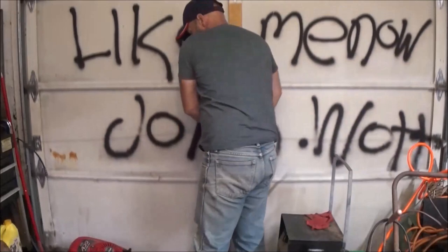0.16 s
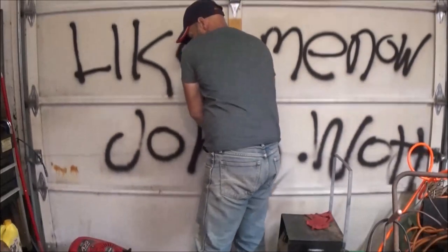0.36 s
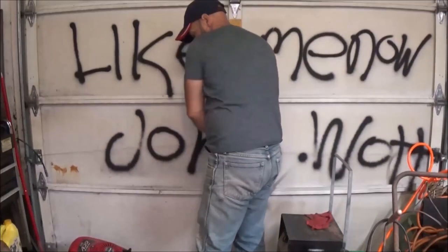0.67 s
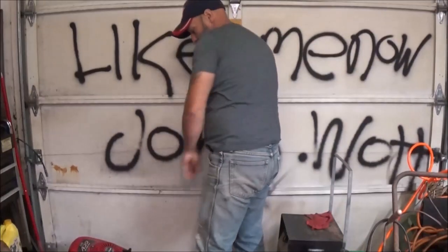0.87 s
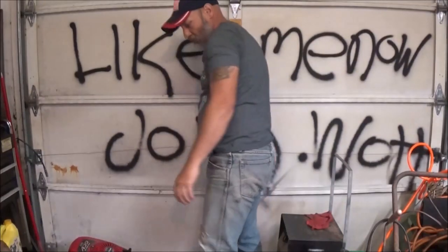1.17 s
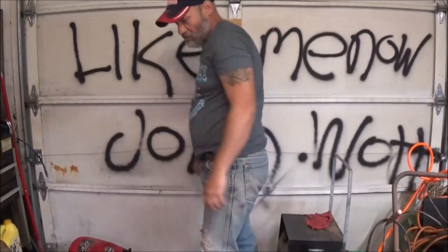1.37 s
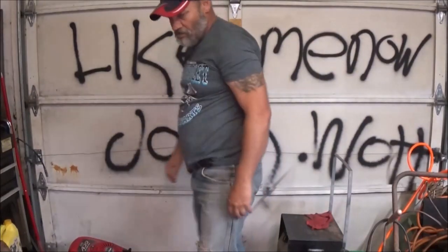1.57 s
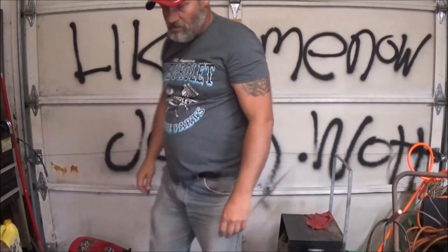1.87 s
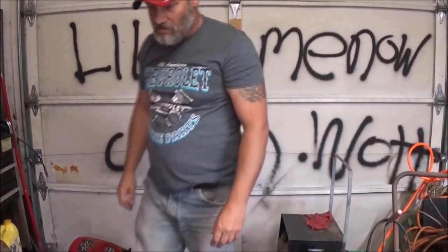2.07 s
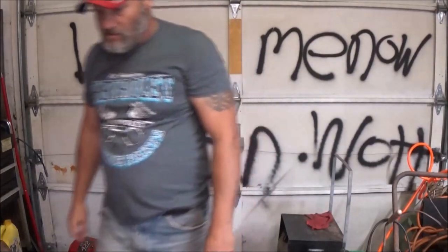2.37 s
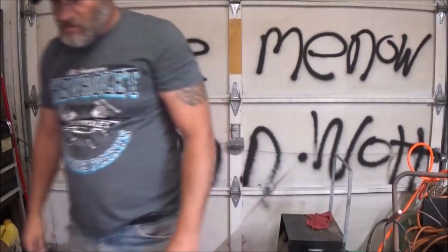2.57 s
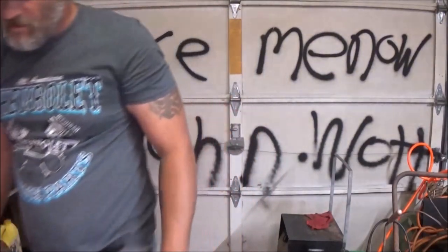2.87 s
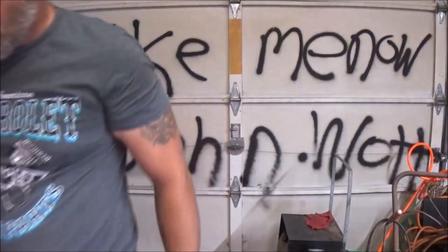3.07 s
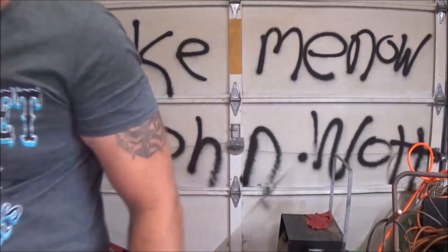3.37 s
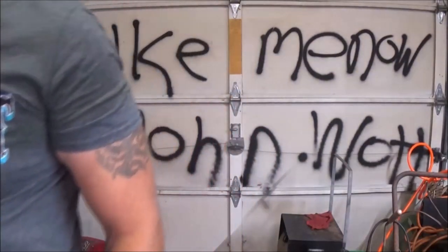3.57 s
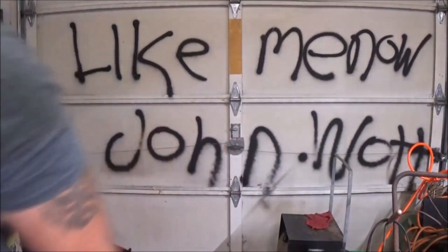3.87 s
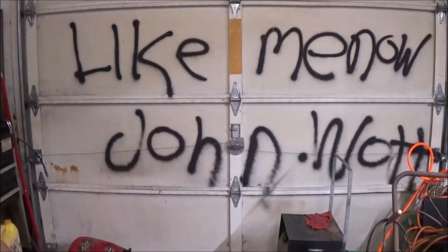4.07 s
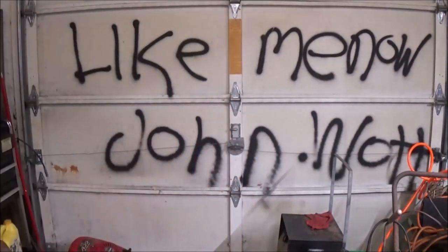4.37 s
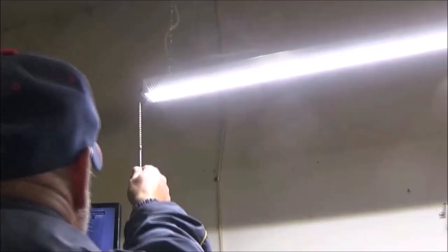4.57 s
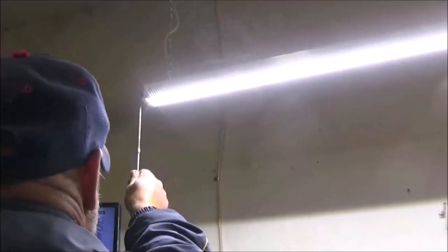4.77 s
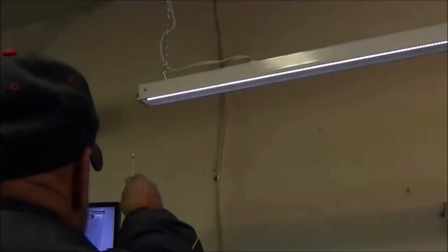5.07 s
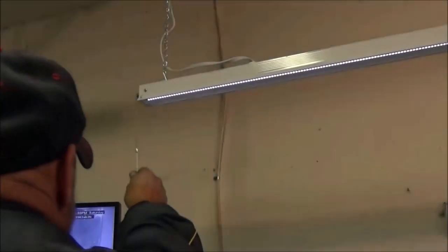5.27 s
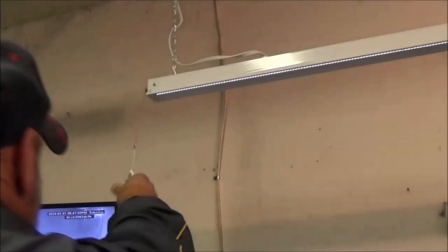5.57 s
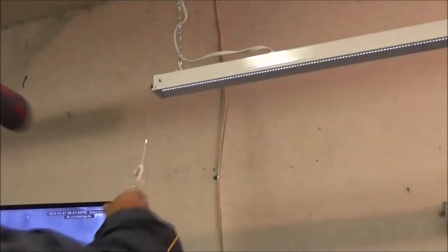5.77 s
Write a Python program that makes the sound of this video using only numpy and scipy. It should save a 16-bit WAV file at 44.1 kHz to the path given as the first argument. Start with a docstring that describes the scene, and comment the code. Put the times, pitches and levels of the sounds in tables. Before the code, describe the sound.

A metal garage door scrapes and shrieks shut with a ringing bang, then light scuffs and knocks, and a few sharp pull-chain switch clicks.

```python
"""Garage door and lamp switch

A metal door scrapes, groans and shrieks down its tracks, bangs shut and rings as decaying sines; a latch
pings. Knocks, scuffs and cloth (contact bursts and filtered grains) follow. After a 35 dB dip of 32 ms a
pull-chain switch clicks as short resonances. Noise gives a ducking hiss, a rumble and two faint hums.
"""
import sys
import numpy as np
from scipy import signal
from scipy.fft import rfft, irfft
from scipy.io import wavfile
from scipy.ndimage import uniform_filter1d

SR = 44100
rng = np.random.default_rng(int(sys.argv[2]) if len(sys.argv) > 2 else 0)


def store_pcm(level_fs):
    """Save levels as 16-bit WAV."""
    pcm = np.round(np.clip(level_fs, -1, 1) * 32767).astype(np.int16)
    wavfile.write(sys.argv[1], SR, np.atleast_2d(pcm).T)


N = 260631

# Panels and rollers banging. Each row: start in seconds, level in dB, fade in seconds, tilt in dB per octave.
DOOR_BLOWS = [(0.0, -8.5, 0.016, 1), (0.023, -15, 0.024, 0), (0.115, -16.5, 0.043, 2),
              (0.166, -11, 0.022, 4), (0.185, -17, 0.046, -3), (0.301, -15, 0.012, 7),
              (0.349, -9, 0.016, 1.5), (0.444, -10, 0.038, 7.5), (0.494, -12.5, 0.052, 4.5),
              (0.535, -13, 0.077, 4), (0.59, -14, 0.063, 2), (0.81, -32.5, 0.032, 1),
              (0.981, -40, 0.035, 0)]
# Spectrum of the door. Each row: frequency in Hz, relative density in dB per Hz.
DOOR_SPECTRUM = [(24, -54), (40, -28.5), (260, -4.5), (591, -3.5), (704, -0.5), (949, 0.5), (1130, -1),
                 (1730, 2), (1910, -1.5), (2510, -4), (3380, -5), (3930, -4.5), (9650, -15), (13700, -32),
                 (15500, -55)]
# Track resonances. Each row: frequency in Hz, width in Hz, relative level in dB.
TRACK_MODES = [(1600, 110, -0.5), (2480, 160, 0), (2750, 170, -2), (2884, 110, -0.5)]
# Resonances of the groaning roller. Each row: frequency in Hz, width in Hz, relative level in dB.
ROLLER_MODES = [(1170, 90, 7.5), (1260, 110, 3), (1540, 53, 10), (3910, 78, 2), (3920, 82, -9)]
# Hinges, brackets and struts that buzz. Each row: frequency in Hz, relative level in dB.
LOOSE_PARTS = [(638, 3), (690, 5), (895, -2.5), (1146, -1), (1253, 3), (1777, 2), (2031, -14), (2080, 5),
               (2339, 5.5), (2478, 4), (2868, -23), (3052, -1), (3817, -4.5), (4250, 2), (6085, 1),
               (6780, -6), (8100, -1)]
# Rollers scrape, then harder as the door is pressed home. Each row: start in seconds, hold in seconds,
# level in dB.
SCRAPES = [(0, 0.43, -24), (.46, 0.18, -20)]
# Tracks shriek where rollers bind. Each row: start in seconds, hold in seconds, level in dB.
SHRIEKS = [(0, 0.13, -32.5), (.458, 0.047, -15.5), (.595, 0.0089, -21), (.815, .01, -32)]
# One roller groans. Each row: start in seconds, hold in seconds, level in dB.
GROANS = [(.166, 0.021, -14.5)]
# Panels and springs after the slam. Each row: frequency in Hz, level in dB, 60 dB decay in seconds.
DOOR_MODES = [(690, -46, 1.1), (773, -52, 5), (764, -61, 3.1), (1070, -37, 0.25), (1316, -23, 0.17),
              (1532, -56, 2.4), (1685, -56, 4), (2190, -44, 1.4), (2160, -36.5, 1.75), (2360, -31, 0.9),
              (3020, -57, 1.3)]
# Latch pings. Each row: start in seconds, level in dB.
LATCH_PINGS = [(0.299, -24.5), (0.981, -44)]
# Latch modes. Each row: frequency in Hz, relative level in dB, 60 dB decay in seconds.
LATCH_MODES = [(2665, -2.5, 0.22), (3830, -13, 0.3), (4280, -9, 0.41), (6130, -17, 0.16), (7300, -2, 0.35),
               (7300, -13, 0.43), (7763, -5, 0.36), (8600, -7, 0.22)]

# Hiss spectrum. Each row: frequency in Hz, relative density in dB per Hz.
HISS_SPECTRUM = [(25, -30), (60, -16.5), (160, 2), (230, -1.5), (330, 2), (520, 3.5), (760, 4.5),
                 (1170, 3.5), (2500, 2), (3620, 0), (7000, -2.5), (9540, 0), (12000, -8.5), (15500, -12.5)]
# Rumble spectrum. Each row: frequency in Hz, relative density in dB per Hz.
RUMBLE_SPECTRUM = [(15, -25), (30, -4), (65, 0), (120, -16), (250, 9), (1000, -31)]
# Faint wavering hums. Each row: start in seconds, hold in seconds, level in dB.
HUMS = [(5.46, 0.058, -54), (5.62, 0.13, -55.5)]

# Grit and cloth snapping under the stride. Each row: start in seconds, level in dB, fade in seconds,
# tilt in dB per octave.
SCUFFS = [(1.532, -44.5, 0.018, 6.5), (1.626, -38.5, .025, 23), (1.654, -30, 0.0042, 19),
          (1.694, -38.5, 0.0088, 17), (2.187, -38.5, 0.003, 10), (2.257, -34, 0.0033, 10),
          (2.378, -33, 0.0022, 15), (2.465, -27.5, 0.0064, 10.5), (2.52, -27, 0.0029, 19),
          (2.555, -27, 0.0067, 15.5), (3.216, -35, 0.0063, 1), (3.346, -34, 0.0054, 7)]
# Scuff spectrum. Each row: frequency in Hz, relative density in dB per Hz.
SCUFF_SPECTRUM = [(100, -30), (600, 13), (2500, 17.5), (5000, 2.5), (7500, -0.5), (9700, 1.5), (12000, -14),
                  (15500, -30)]
# Footfalls and knocks. Each row: start in seconds, level in dB, fade in seconds, tilt in dB per octave,
# hollow note in Hz, hollow level relative to the thud in dB.
KNOCKS = [(1.64, -53.5, 0.011, -18.5, 400, -6), (1.81, -48.5, 0.012, 2, 1200, -2),
          (2.389, -45, .012, -5.5, 290, 4.5), (2.617, -35.5, 0.0096, -2.5, 1050, -4),
          (3.13, -43, 0.0133, -8, 282, -2), (3.452, -51, 0.014, -8, 740, 13),
          (3.541, -28.5, 0.025, -0.5, 645, -9.5), (4.143, -25.5, 0.012, -3, 980, -5.5),
          (4.149, -23.5, 0.025, 3.5, 620, -3.5), (4.297, -38.5, 0.014, -1.5, 402, -9),
          (4.425, -39, 0.03, 2.5, 610, -15)]
# Thud spectrum. Each row: frequency in Hz, relative density in dB per Hz.
KNOCK_SPECTRUM = [(50, -23), (80, -24), (150, -11), (220, -13), (330, -2), (600, 2), (1100, 3),
                  (2200, -3.5), (3500, -11), (4900, -3), (6500, -10.5), (9300, -5.5), (12000, -16.5),
                  (15500, -31)]
# Clothes brushing as a limb swings. Each row: start in seconds, hold in seconds, level in dB.
SWISHES = [(1.64, 0.047, -51.5), (2.42, 0.13, -50), (2.56, 0.047, -44.5), (3.07, 0.041, -55.5),
           (3.23, 0.032, -44), (3.4, 0.61, -49.5), (3.6, 0.053, -43), (4.27, 0.018, -41),
           (4.44, 0.012, -49.5), (4.61, .02, -43), (5.17, .12, -46.5), (5.86, .05, -42)]
# Cloth spectrum. Each row: frequency in Hz, relative density in dB per Hz.
CLOTH_SPECTRUM = [(35, -87), (60, -52), (167, -20.5), (385, -4.5), (755, -0.5), (998, -4), (1350, -2),
                  (1550, -1), (2050, 0.5), (3420, -3), (9510, -4), (15500, -21)]

# Pull-chain clicks. Each row: start in seconds, level in dB, fade in seconds, tilt in dB per octave,
# housing thump in dB, room send in dB, main note in Hz; thump and send are relative to the level.
SWITCH_CLICKS = [(4.914, -24, 0.0013, -5, -12, -2, 2870), (5.015, -17, 0.0017, -6.5, -5.5, 5, 3500),
                 (5.031, -10, 0.0015, 3.5, 8, -0.5, 1600), (5.271, -20, 0.0012, 12.5, -1, -4, 3900),
                 (5.3207, -20, 0.0011, 13, 1.5, -10, 3800), (5.3455, -5, 0.000995, 0.5, -16, -4, 4160)]
# Ratchet resonances. Each row: frequency in Hz, width in Hz, relative level in dB.
SWITCH_MODES = [(1106, 220, -4.5), (1590, 200, -4.5), (2220, 250, 1), (2770, 430, 3), (4120, 500, 4.5),
                (5500, 1070, 2.5), (7350, 1700, -8), (9400, 1500, -7.5), (12200, 1200, -18)]
# Lamp housing spectrum. Each row: frequency in Hz, relative density in dB per Hz.
HOUSING_SPECTRUM = [(50, -29), (110, -7.5), (220, -22), (380, -4.5), (560, -3.5), (850, 4.5), (1300, -3.5),
                    (1600, 3.5), (2300, 2), (3200, 5.5), (5000, -1.5), (7500, -1.5), (9600, 0), (12000, -5),
                    (15500, -21)]
# Direct click, then returns from lamp and ceiling. Each row: delay in seconds, gain in dB.
CEILING_RETURNS = [(0, -4), (.0024, -6.5), (.0044, -3.5)]

# Garage decay. Each row: frequency in Hz, 60 dB decay in seconds.
GARAGE_T60 = [(100, 0.72), (500, 0.4554), (2000, 0.3956), (5000, 0.3836), (10000, 0.3359), (15000, 0.2754)]
# Side filter at the microphones. Each row: frequency in Hz, side gain against mid in dB.
SIDE_GAIN = [(60, -22), (125, -28), (250, -15), (500, -6.5), (2000, -4.5), (8500, -4.5), (12000, -17)]
# Level dip: start in seconds, end in seconds.
DIP_S = (4.574, 4.606)

HISS_DB, LATE_HISS_DB = -53, -49.5   # before ducking; late = after the dip
DUCK_ABOVE_DB, DUCK_SHARE, RECOVER_DB_PER_S = -31, 0.72, 10
CUTOFF_HZ = 15800


def from_db(db):
    """Decibels to amplitude."""
    return 10 ** (np.asarray(db) / 20)


def rms_one(x):
    """Scale x to rms 1."""
    return x / np.sqrt(np.mean(x ** 2) + 1e-20)


def as_strong(x, model):
    """Scale x to the energy of model."""
    return x * np.linalg.norm(model) / np.linalg.norm(x)


def at_hz(points, hz):
    """Interpolate a table on a log-frequency axis."""
    table = np.array(points)
    return np.interp(np.log(hz), np.log(table[:, 0]), table[:, 1])


def add(out, start_s, x):
    """Mix x into out from start_s on."""
    start = max(round(start_s * SR), 0)
    out[start:start + len(x)] += x[:N - start]


def colour(x, spectrum, tilt_db=0, keep_power=True, size=4096):
    """Minimum-phase filter with the given spectrum, tilted per octave above 250 Hz."""
    hz = np.maximum(np.arange(size // 2 + 1) * SR / size, 10)
    gain = from_db(at_hz(spectrum, hz) + tilt_db * np.log2(np.maximum(hz, 250)))
    # Folding the cepstrum onto positive time gives minimum phase.
    cepstrum = irfft(np.log(gain + 1e-9))
    cepstrum[1:size // 2] *= 2
    cepstrum[size // 2 + 1:] = 0
    response = irfft(np.exp(rfft(cepstrum)))
    if keep_power:
        response = response / np.linalg.norm(response)
    return signal.oaconvolve(x, response)[:len(x)]


def resonate(x, modes):
    """Parallel two-pole resonances of (Hz, width Hz, dB), signs alternating."""
    out = 0
    for k, (hz, width_hz, db) in enumerate(modes):
        r = np.exp(-np.pi * width_hz / SR)
        poles = [1, -2 * r * np.cos(2 * np.pi * hz / SR), r * r]
        band = (1 - r * r) / 2 * signal.lfilter([1, 0, -1], poles, x)
        out = out + (-1) ** k * from_db(db) * band
    return out


def grains(per_s, spread_db):
    """Random tiny slips of uneven size; rms 1."""
    sizes = from_db(spread_db * np.minimum(rng.exponential(1, N), 4))
    signs = rng.choice([-1, 1], N)
    return rms_one(sizes * signs * (rng.random(N) < per_s / SR))


def chatter(fade_s, rise_share=0.06, size=16384):
    """One blow: dense contacts gather quickly and die away, exciting all pitches about evenly."""
    age = np.arange(size) / (SR * fade_s)
    envelope = np.exp(-age) * (1 - np.exp(-age / rise_share))
    run = rng.choice([-1, 1], size) * envelope
    for _ in range(3):
        flat = irfft(np.exp(1j * np.angle(rfft(run))))
        run = flat * np.exp(-(age / 4) ** 2)
    return as_strong(run, envelope)


def blows(rows, spectrum, rise_share):
    """Bursts of contact on one body, each with its own spectral tilt."""
    out = np.zeros(N)
    for start_s, db, fade_s, tilt_db in rows:
        blow = colour(chatter(fade_s, rise_share), spectrum, tilt_db)
        add(out, start_s, from_db(db) * blow)
    return out


def strokes(rows, attack_s, release_s):
    """Gain of strokes that swell up to their start, hold and die away exponentially; powers add."""
    t, power = np.arange(N) / SR, 1e-18
    for start_s, held_s, db in rows:
        before = np.maximum(start_s - t, 0) / attack_s
        after = np.maximum(t - start_s - held_s, 0) / release_s
        power = power + (from_db(db) * np.exp(-before - after)) ** 2
    return np.sqrt(power)


def stereo(mid, side):
    """Close microphones hear diffuse bass alike and diffuse treble less so."""
    side = colour(side, SIDE_GAIN, keep_power=False)
    return np.array([mid + side, mid - side])


def reverberation(x, build_s, size=32768):
    """Diffuse stereo tail: noise bands that build up together and decay at their own rates."""
    t, tail = np.arange(size) / SR, 0
    white = rng.standard_normal((2, 2, size))
    edges_hz = np.geomspace(40, 18000, 14)
    for k, band_hz in enumerate(zip(edges_hz, edges_hz[1:])):
        noise = signal.sosfilt(signal.butter(2, band_hz, "band", fs=SR, output="sos"), white[k % 2])
        t60_s = at_hz(GARAGE_T60, np.sqrt(np.prod(band_hz)))
        tail = tail + noise * np.exp(-np.log(1000) * t / t60_s)
    tail = tail * (1 - np.exp(-t / build_s))
    response = stereo(*tail / np.linalg.norm(tail[0]))
    return signal.oaconvolve(x[None], response, axes=1)[:, :N]


def garage(x, wet_db, build_s):
    """Direct sound plus diffuse room, scaled to keep the power roughly constant."""
    wet = from_db(wet_db)
    return (x + wet * reverberation(x, build_s)) / np.hypot(1, wet)


def jerks(per_s, depth_db):
    """Stick-slip gain gliding to a new random value per_s times a second; rms 1."""
    swerves = np.clip(rng.standard_normal(2000), -1.7, 1.7)
    glide = np.interp(np.arange(N) / SR * per_s, np.arange(len(swerves)), swerves)
    return rms_one(from_db(depth_db * glide))


def loose_parts(per_s, width_hz):
    """Each part is knocked at random moments and buzzes at its own pitch; rms 1."""
    touches = rng.random((len(LOOSE_PARTS), N)) < per_s / SR
    buzz = 0
    for touch, (hz, db) in zip(touches, LOOSE_PARTS):
        buzz = buzz + resonate(touch + 1e-18, [(hz, width_hz, db)])
    return rms_one(buzz)


def door(loose_db=-4):
    """Rollers scrape, groan and shriek in the tracks while panels bang and loose parts buzz."""
    bangs = blows(DOOR_BLOWS, DOOR_SPECTRUM, rise_share=0.13)
    rubbing = colour(grains(per_s=4000, spread_db=2.5), DOOR_SPECTRUM, tilt_db=-1.0)
    rubbing = rubbing * jerks(per_s=50, depth_db=2.5)
    buzz = from_db(loose_db) * loose_parts(per_s=40, width_hz=45)
    scrape = strokes(SCRAPES, attack_s=0.023, release_s=0.041) * (rubbing + buzz)
    slips = grains(per_s=5000, spread_db=1)
    # Each roller mode jerks on its own.
    roller = sum(resonate(slips, [mode]) * jerks(per_s=47.6, depth_db=8) for mode in ROLLER_MODES)
    groan = strokes(GROANS, attack_s=0.023, release_s=0.025) * rms_one(roller)
    tracks = rms_one(resonate(slips, TRACK_MODES))
    shriek = strokes(SHRIEKS, attack_s=0.007, release_s=0.019) * tracks
    return garage(bangs + scrape + groan + shriek, wet_db=-4.5, build_s=0.00093)


def ducking(sound):
    """Gain that drops at once by a share of the excess level, then recovers at a steady dB rate."""
    power = np.abs(uniform_filter1d(np.mean(sound ** 2, axis=0), size=1024))
    loud_db = 10 * np.log10(power + 1e-12)
    drop_db = DUCK_SHARE * np.maximum(loud_db - DUCK_ABOVE_DB, 0)
    recovery_db = RECOVER_DB_PER_S * np.arange(N) / SR
    return from_db(recovery_db - np.maximum.accumulate(drop_db + recovery_db))


def background(foreground, hum_hz=535, resonator_width_hz=110, rumble_db=-78):
    """Noise hiss ducked by loud sounds, low noise rumble, and hums of noise through two resonators."""
    hiss = stereo(*[colour(white, HISS_SPECTRUM) for white in rng.standard_normal((2, N))])
    hiss_db = np.where(np.arange(N) / SR < DIP_S[1], HISS_DB, LATE_HISS_DB)
    ducked_hiss = from_db(hiss_db) * ducking(foreground) * hiss
    rumble = from_db(rumble_db) * colour(rng.standard_normal(N), RUMBLE_SPECTRUM)
    hum = rng.standard_normal(N)
    for _ in range(2):
        hum = resonate(hum, [(hum_hz, resonator_width_hz, 0)])
    hum = strokes(HUMS, attack_s=0.023, release_s=0.036) * rms_one(hum)
    return ducked_hiss + rumble + hum


def ring(modes):
    """Decaying sines of struck metal, from (Hz, dB, t60 s)."""
    t = np.arange(3 * SR) / SR
    return sum(from_db(db - 60 * t / t60_s) * np.sin(2 * np.pi * hz * t) for hz, db, t60_s in modes)


def door_ring(slam_s=0.49):
    """Struck modes decay exponentially: panels and springs after the slam, the latch at each touch."""
    out, ping = np.zeros(N), ring(LATCH_MODES)
    add(out, slam_s, ring(DOOR_MODES))
    for start_s, db in LATCH_PINGS:
        add(out, start_s, from_db(db) * ping)
    return garage(out, wet_db=-12, build_s=0.004)


def knocks():
    """Each contact makes a coloured thud and excites a hollow resonance of its own."""
    out = np.zeros(N)
    for start_s, db, fade_s, tilt_db, hollow_hz, hollow_db in KNOCKS:
        contact = chatter(fade_s, rise_share=0.15)
        thud = colour(contact, KNOCK_SPECTRUM, tilt_db)
        hollow = as_strong(resonate(contact, [(hollow_hz, hollow_hz / 3, 0)]), contact)
        add(out, start_s, from_db(db) * (thud + from_db(hollow_db) * hollow))
    return out


def walker():
    """Short contacts make scuffs, footfalls and knocks; many tiny slips make the brush of clothes."""
    scuffs = blows(SCUFFS, SCUFF_SPECTRUM, rise_share=0.1)
    rustle = colour(grains(per_s=9000, spread_db=4.0), CLOTH_SPECTRUM)
    cloth = strokes(SWISHES, attack_s=0.083, release_s=0.1) * rustle
    steps = garage(knocks() + cloth, wet_db=-2.5, build_s=0.0022)
    return steps + garage(scuffs, wet_db=-4.0, build_s=0.0043)


def lamp_switch(crack_db=-13, note_db=-3, note_width_hz=260, size=4096):
    """Each ratchet snap cracks, rings a note, thumps the lamp housing and excites the room."""
    near, far = np.zeros(N), np.zeros(N)
    snap = signal.unit_impulse(size)
    crack = from_db(crack_db) * resonate(snap, [(4550, 5300, 0)])
    ratchet = resonate(snap, SWITCH_MODES) + crack
    housing = colour(snap, HOUSING_SPECTRUM)
    for start_s, db, fade_s, tilt_db, thump_db, room_db, note_hz in SWITCH_CLICKS:
        note = as_strong(resonate(snap, [(note_hz, note_width_hz, 0)]), snap)
        note = from_db(note_db) * note
        # The housing answers one fade later.
        thump = from_db(thump_db) * np.roll(housing, round(fade_s * SR))
        click = as_strong(colour(ratchet, [(1, 0)], tilt_db), snap) + thump
        add(near, start_s, from_db(db) * signal.fftconvolve(note, chatter(2 * fade_s)))
        for delay_s, return_db in CEILING_RETURNS:
            returned = signal.fftconvolve(click, chatter(fade_s, rise_share=0.065))
            add(near, start_s + delay_s, from_db(db + return_db) * returned)
        sent = signal.fftconvolve(click, chatter(fade_s, rise_share=0.014))
        add(far, start_s, from_db(db + room_db) * sent)
    return near + reverberation(far, build_s=0.009)


def scene():
    """Sum of all sources; the whole level dips briefly before the lamp."""
    t = np.arange(N) / SR
    outside_dip = (t < DIP_S[0]) | (t > DIP_S[1])
    level = uniform_filter1d(1.0 * outside_dip, size=64)
    foreground = door() + door_ring() + walker() + lamp_switch()
    return (foreground + background(foreground)) * np.maximum(level, from_db(-35))


def record(dry):
    """Round the highest peaks, then low-pass steeply."""
    rounded = dry / (1 + dry ** 6) ** (1 / 6)
    lowpass = signal.ellip(10, 0.2, 80, CUTOFF_HZ, fs=SR, output="sos")
    return signal.sosfilt(lowpass, rounded)


dry = scene()
out = record(dry)
store_pcm(out)
```